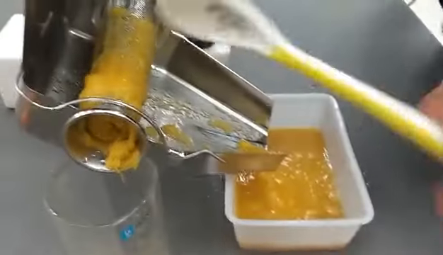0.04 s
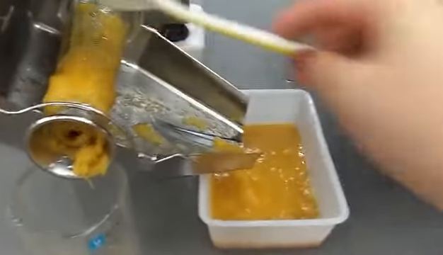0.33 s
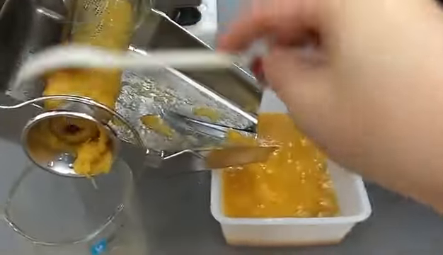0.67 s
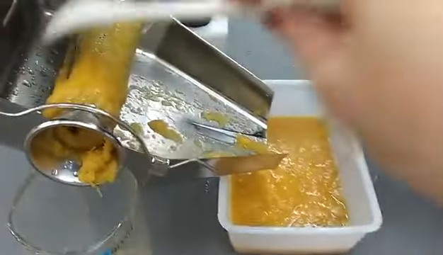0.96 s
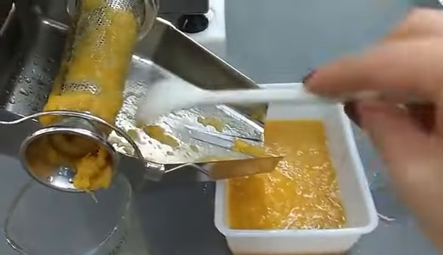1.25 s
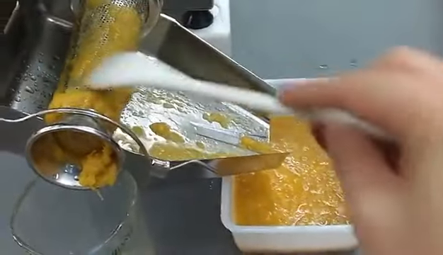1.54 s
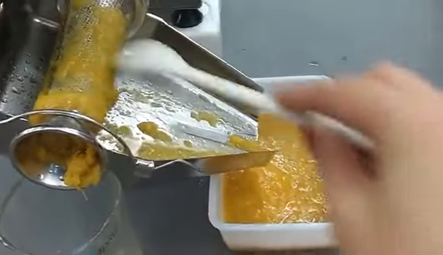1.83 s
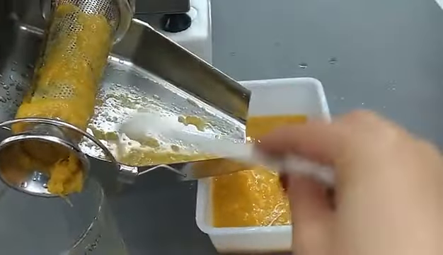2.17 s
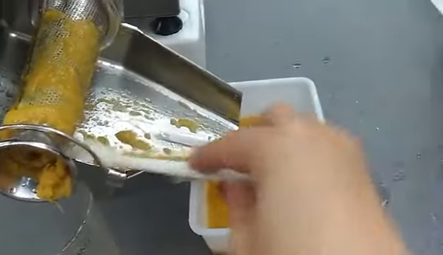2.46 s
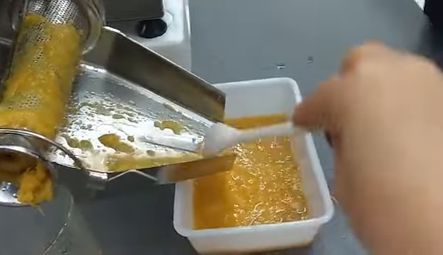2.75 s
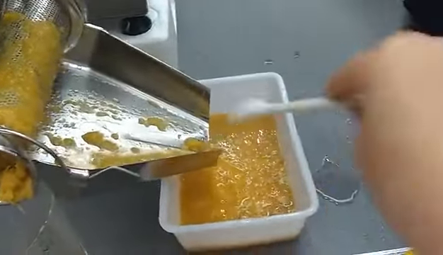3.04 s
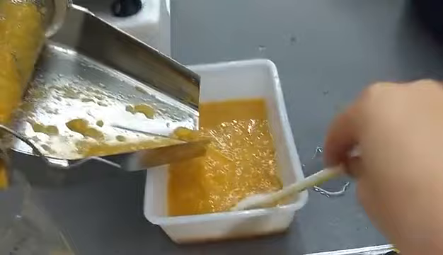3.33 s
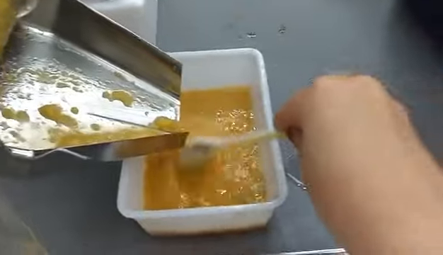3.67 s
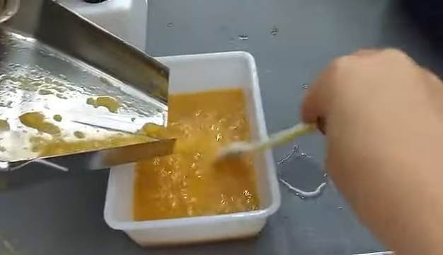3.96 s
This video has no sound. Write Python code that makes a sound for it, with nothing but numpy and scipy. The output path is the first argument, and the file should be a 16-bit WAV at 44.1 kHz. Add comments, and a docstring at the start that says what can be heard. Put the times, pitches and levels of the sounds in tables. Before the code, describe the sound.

Close up in a small room, a slow juicer runs with a steady grinding hum, pulp crackles and dull knocks. Early on a plastic spoon scrapes briefly; later it strikes steel twice, with a squeaky scrape in between.

```python
"""A slow juicer on a counter in a small room, close to a stereo microphone.
From the start the motor hums, the gears shake the housing, and the screw crunches pulp and knocks dully.
Almost at once a plastic spoon rasps over the holes of the strainer. Just after two seconds it strikes
the steel chute, drags down it with a brief squeal, then strikes the lip and slides off.
The room answers pulp, knocks and spoon with a short tail, and the machine runs on."""
import sys
import numpy as np
from scipy import signal
from scipy.fft import rfft, irfft
from scipy.io import wavfile
from scipy.ndimage import uniform_filter1d

SR = 44100
rng = np.random.default_rng(int(sys.argv[2]) if len(sys.argv) > 2 else 0)


def dump_mix(stems):
    """Bounce the given channels to the path in sys.argv[1] as a 16-bit WAV at rate SR."""
    frames = np.atleast_2d(stems).T  # one column per channel
    limited = np.clip(frames, -1, 1)  # hard clip at full scale
    pcm = np.round(limited * 32767).astype(np.int16)
    wavfile.write(sys.argv[1], SR, pcm)


N = 176400
SLIPS_PER_S, SLIP_SPREAD_DB = 2400, 1.5

# modes of the steel chute: pitch_hz, relative_db, t60_s
CHUTE_MODES = [(584, -13, .09), (706, -11, 0.13), (843, -8, 0.092), (1100, -9, .07), (1537, -4, 0.088),
               (1911, -2, 0.07), (2100, -12.5, 0.042), (2350, -9, 0.035), (2480, -5.5, 0.088),
               (2797, -8, 0.09), (3520, -11, 0.15), (3860, -6, .05), (4320, -9.5, 0.065), (4910, -7, 0.045),
               (6620, -14.5, 0.07)]
# dense clatter of spoon on steel: frequency_hz, relative_db
CLATTER_SPECTRUM = [(120, -15.5), (450, -10.5), (800, -5), (1400, -7), (2800, 2), (4000, -10.5),
                    (5300, -25), (7300, -24), (8200, -69.5)]


def amp(db):
    """Decibels to gain."""
    return 10 ** (np.asarray(db) / 20)


def unit(x):
    """Scales to rms 1."""
    return x / np.sqrt(np.mean(x ** 2) + 1e-20)


def bins():
    """Frequencies of a whole-length spectrum."""
    return np.fft.rfftfreq(N, 1 / SR)


def db_at(points, hz):
    """Reads rows of (frequency_hz, level_db) on a log-frequency axis."""
    frequency_hz, level_db = np.transpose(points)
    return np.interp(np.log(hz + 1), np.log(frequency_hz + 1), level_db)


def response(points):
    """Gain at every bin from rows of (frequency_hz, level_db)."""
    return amp(db_at(points, bins()))


def envelope(points, outside_db=None):
    """Gain over time from rows of (time_s, level_db); the ends hold unless outside_db is given."""
    return amp(np.interp(np.arange(N) / SR, *np.transpose(points), left=outside_db, right=outside_db))


def add(mix, start_s, sound):
    """Mixes a stereo sound in at start_s."""
    part = mix[:, round(start_s * SR):][:, :sound.shape[1]]
    part += sound[:, :part.shape[1]]


def side_share(hz):
    """Stereo width at the microphone as a gain: narrow bass, wide treble."""
    # side against mid: frequency_hz, side_db
    width = [(30, -21), (80, -28.5), (170, -39), (320, -19.5), (700, -13), (1400, -4.5), (2800, -3),
             (5000, 1.5), (7500, 0.5)]
    return amp(db_at(width, hz))


def colour(pair, gain):
    """Filters two unrelated signals into left and right, alike in the bass; rms 1."""
    mid, side = rfft(pair)
    side = side * side_share(bins())
    return unit(irfft(np.array([mid + side, mid - side]) * gain, N))


def noise(gain):
    """Stereo noise with the given spectrum, rms 1."""
    return colour(rng.standard_normal((2, N)), gain)


def band(hz, width_hz):
    """Noise in one resonance."""
    return noise(1 / (1 + 1j * (bins() - hz) / width_hz) ** 2)


def glide(x, shift_hz):
    """Moves a sound up and down in frequency by shift_hz."""
    return (signal.hilbert(x) * np.exp(2j * np.pi * np.cumsum(shift_hz) / SR)).real


def drift(rate_hz):
    """Slow random movement, rms 1."""
    return unit(irfft(rfft(rng.standard_normal(N)) / (1 + (bins() / rate_hz) ** 4), N))


def clicks(per_s, spread_db):
    """Random clicks of uneven size, each with its own direction."""
    size = amp(spread_db * np.minimum(rng.exponential(1, N), 4))
    angle = rng.uniform(0, 2 * np.pi, N)
    return size * (rng.random(N) < per_s / SR) * np.array([np.cos(angle), np.sin(angle)])


def patchy(x, depth_db, length_s, band_hz):
    """Patches of time and frequency swell and sink at random."""
    frames = signal.stft(x, nperseg=512)[2]
    hop_s, bin_hz = 256 / SR, SR / 512
    patches = rng.standard_normal(frames.shape[1:])
    patches = uniform_filter1d(patches, max(1, round(band_hz / bin_hz)), axis=0)
    patches = unit(uniform_filter1d(patches, max(1, round(length_s / hop_s)), axis=1))
    return signal.istft(frames * unit(amp(depth_db * patches)))[1][:, :N]


def motor():
    """Magnetic hum, steady in pitch, whose lines waver in strength."""
    # lines of the hum: pitch_hz, relative_db
    lines = [(49.9, -54), (100, -54), (300.05, -36), (400, -56), (1200, -56)]
    # swells and dips of the whole hum: time_s, relative_db
    swells = [(0.0, -34.5), (0.23, -38.5), (0.27, -28.5), (0.52, -38), (0.67, -28.5), (0.98, -39),
              (1.02, -33.5), (1.27, -42.5), (1.76, -32), (1.87, -37), (2.07, -30.5), (2.85, -38.5),
              (3.09, -34.5), (3.36, -40), (3.44, -31), (3.79, -38), (3.85, -30), (4.0, -39.5)]
    t, out = np.arange(N) / SR, np.zeros((2, N))
    for hz, db in lines:
        skew = np.arctan(side_share(hz)) * np.array([[-.5], [.5]])  # phase between left and right
        strength = amp(db + 0.5) * np.sqrt(2) * (1 + 0.16 * drift(rate_hz=7.1))
        out += strength * np.sin(2 * np.pi * (hz * t + rng.random()) + skew)
    return out * unit(envelope(swells))


def gears():
    """The gears churn, and their faint whine swings in pitch as the load comes and goes once a turn."""
    # gear noise: frequency_hz, relative_db
    spectrum = [(15, -45), (35, -17), (50, -12.5), (70, -8.5), (120, -10.5), (230, -12), (350, -6.5),
                (500, -12.5), (650, -17.5), (780, -8.5), (1040, -12.5), (1240, -13.5), (1670, -20),
                (1940, -13), (2420, -21.5), (2750, -16), (4000, -28), (5300, -34.5), (7300, -43),
                (8200, -83.5)]
    turns_per_s, top_s, swing_hz = 2.83, .255, 18
    turn = np.cos(2 * np.pi * turns_per_s * (np.arange(N) / SR - top_s))
    churn = patchy(noise(response(spectrum)), depth_db=2.5, length_s=0.053, band_hz=450)
    whine = glide(band(hz=1968, width_hz=6), swing_hz * turn)
    return amp(-36 - 0.1 * turn) * churn + amp(-46.5) * whine


def housing():
    """Shaken by the gears, the housing drones at its resonances."""
    # resonances of the housing: pitch_hz, width_hz, level_db
    resonances = [(155.6, 7.1, -45), (177.5, 5.3, -46.5), (247, 35.6, -42.5), (293.7, 18.4, -43),
                  (395.7, 11, -53.5), (417.8, 9.1, -49), (622.4, 28.4, -41), (667.5, 17, -42),
                  (713, 29, -51.5), (1143.6, 21, -46.5), (1193, 18, -49.5), (1297, 14, -49),
                  (1449, 35, -48.5), (857, 45, -47), (2690, 190, -52)]
    return sum(amp(db) * band(hz, width_hz) for hz, width_hz, db in resonances)


def pulp():
    """Pulp crackles in the screw all along, and at times crunches louder."""
    # crunching pulp: frequency_hz, relative_db
    spectrum = [(200, -25), (600, 2), (1200, 3.5), (2200, -2), (3300, -8.5), (5000, -20.5), (7400, -34),
                (8000, -77)]
    # louder crunches: start_s, length_s, level_db, tilt_db_per_octave
    crunches = [(0.294, 0.055, -30, -2), (1.039, 0.035, -30.5, 2), (1.137, 0.018, -40, 5),
                (1.302, 0.018, -31, 5.5), (1.692, 0.062, -32.5, -1), (2.044, 0.096, -37.5, -1.5),
                (2.941, 0.024, -31.5, -2), (3.23, 0.018, -26.5, 0.5), (3.688, 0.033, -30.5, -0.5)]
    tone, octaves, rise_s = response(spectrum), np.log2(bins() + 1), .007
    out = amp(-45.5) * colour(clicks(per_s=250, spread_db=2), tone)
    crackle = clicks(per_s=2500, spread_db=1.9)
    for start_s, length_s, db, tilt in crunches:
        age = np.maximum(np.arange(N) / SR - start_s, 0)
        shape = np.minimum(age / rise_s, 1) * np.exp(-(age / length_s) ** 2)
        out += amp(db) * shape * colour(crackle, tone * amp(tilt * octaves))
    return out


def screw_knocks():
    """The screw knocks in its housing, each time one dull, damped tone in the centre."""
    # knocks: start_s, level_db, pitch_hz, t60_s
    knocks = [(0.274, -27.5, 253, 0.22), (1.291, -16.5, 621, 0.079), (1.352, -25, 660, 0.11),
              (2.615, -25, 629, 0.19), (3.403, -25.5, 688, 0.11), (3.452, -22.5, 312, 0.11),
              (3.668, -21.5, 656, 0.094), (3.85, -20, 640, 0.065)]
    t, out, rise_s = np.arange(SR // 4) / SR, np.zeros((2, N)), 0.004
    for start_s, db, hz, t60 in knocks:
        shape = np.minimum(t / rise_s, 1) * amp(db - 60 * t / t60)
        add(out, start_s, shape * np.sin(2 * np.pi * hz * t) * np.ones((2, 1)))
    return out


def rasp(spectrum):
    """Tiny slips make a rasp whose colour shifts as the spoon travels."""
    slips = colour(clicks(SLIPS_PER_S, SLIP_SPREAD_DB), response(spectrum))
    return patchy(slips, depth_db=4, length_s=0.042, band_hz=220)


def strainer_scrape():
    """The spoon ticks over the holes of the pulp-damped strainer, whose resonances shift under it."""
    # the spoon's stroke: time_s, level_db
    stroke = [(.35, -60), (.376, -32.5), (.42, -31.5), (.445, -30), (.52, -29), (.575, -32), (.612, -31),
              (.63, -46)]
    # rasp on the strainer: frequency_hz, relative_db
    spectrum = [(400, -31), (850, -4), (1400, 5), (2000, 2), (2700, -0.5), (3500, 0), (4600, -7),
                (6000, -13.5), (7400, -12), (7900, -57.5)]
    # resonances of the strainer: pitch_hz, width_hz, relative_db
    resonances = [(2200, 65, -2), (2550, 54, 1), (2880, 52, -1.5), (3323, 45, 0), (4420, 25, -4.5),
                  (5100, 22, -9.5), (5670, 29, -7), (6860, 95, -12.5)]
    holes_per_s = 300 * (1 + .2 * drift(rate_hz=29.7))
    ticking = unit(amp(0.5 * np.cos(2 * np.pi * np.cumsum(holes_per_s) / SR)))
    metal = 0
    for hz, width_hz, db in resonances:
        shift_hz = hz * .003 * drift(rate_hz=9)
        metal = metal + amp(db) * glide(band(hz, width_hz), shift_hz)
    return envelope(stroke, outside_db=-120) * ticking * (rasp(spectrum) + amp(-2) * unit(metal))


def spoon_catches():
    """On strainer and chute the spoon catches and lets go with a short clatter."""
    # catches: start_s, level_db
    catches = [(0.44, -20), (.461, -21.5), (0.565, -24), (0.574, -25), (0.602, -20.5), (2.3234, -23.5),
               (2.337, -22.5), (2.342, -22.5), (2.386, -20), (2.392, -25.5), (2.474, -29)]
    t, t60_s = np.arange(N) / SR, 0.04
    snags = sum((t > start_s) * amp(db - 60 * abs(t - start_s) / t60_s) for start_s, db in catches)
    return snags * noise(response(CLATTER_SPECTRUM))


def steel_ring(modes):
    """Steel modes after one impulse, energy 1; high modes reach the two sides out of step."""
    t = np.arange(SR // 3) / SR
    out = np.zeros((2, len(t)))
    for hz, db, t60 in modes:
        skew = np.arctan(side_share(hz)) * rng.choice([-1, 1]) * np.array([[1], [-1]])
        out += amp(db - 60 * t / t60) * np.sin(2 * np.pi * (hz * t + rng.random()) + skew)
    return unit(out) / np.sqrt(len(t))


def burst(spectrum, t60_s, rise_s=0.0012):
    """The dying puff of noise from one contact, energy 1."""
    t = np.arange(SR // 3) / SR
    shape = np.minimum(t / rise_s, 1) * amp(-60 * t / t60_s)
    return unit(noise(response(spectrum))[:, :len(t)] * shape) / np.sqrt(len(t))


def spoon_blows():
    """Each blow cracks and sets the wet steel ringing; the spoon chatters in quick rebounds."""
    # blows on the chute, then its lip: start_s, ring_db, crack_db, left_minus_right_db
    blows = [(2.2266, 14.5, 5.5, -1.5), (2.753, 14, 8.5, 0)]
    # modes of the lip: pitch_hz, relative_db, t60_s
    lip_modes = [(748, -1.5, 0.091), (1410, -13.5, 0.1), (1560, -19.5, 0.071), (1770, -14.5, 0.32),
                 (1960, -11, 0.079), (2500, -1, 0.052), (2598, 6, 0.062), (3000, -19, .08),
                 (3200, -9, 0.047), (3420, -6.5, 0.08), (3810, 1.5, 0.053), (4000, -11, .04),
                 (6540, -23, .06)]
    # first crack of a blow: frequency_hz, relative_db
    crack = [(500, -23), (2500, 1), (4200, 6.5), (5800, -1.5), (8000, -18)]
    # contacts and rebounds within the blows: start_s, level_db
    contacts = [(2.2274, 12.5), (2.2315, 8), (2.2482, 3), (2.7535, 8.5), (2.7566, 8.5), (2.7604, 9.5),
                (2.7745, 3)]
    out, ring_rise_s = np.zeros((2, N)), 0.0018
    onset = np.minimum(np.arange(SR // 3) / SR / ring_rise_s, 1)
    for (start_s, ring_db, crack_db, pan_db), modes in zip(blows, (CHUTE_MODES, lip_modes)):
        pan = amp([[pan_db / 2], [-pan_db / 2]])
        add(out, start_s, pan * amp(crack_db) * burst(crack, t60_s=0.011))
        add(out, start_s, pan * amp(ring_db) * onset * steel_ring(modes))
    for start_s, db in contacts:
        add(out, start_s, amp(db) * burst(CLATTER_SPECTRUM, t60_s=0.045))
    return out


def chute_drag():
    """The spoon rasps down the chute and off its lip; its slips keep the steel ringing."""
    # two strokes, along the chute and off the lip, each in rows of: time_s, level_db
    strokes = [
        [(2.24, -46), (2.275, -32), (2.312, -31.5), (2.344, -28.5), (2.37, -39.5), (2.39, -28.5), (2.428, -31),
         (2.482, -29.5), (2.515, -31), (2.566, -33), (2.61, -67)],
        [(2.765, -24), (2.80, -34), (2.828, -26.5), (2.85, -37), (2.89, -55.5)],
    ]
    # rasp on the chute: frequency_hz, relative_db
    spectrum = [(400, -21), (750, 1), (1270, -7), (2000, -1), (2800, -0.5), (3700, -9), (4800, -12),
                (5400, -27), (6100, -21), (7400, -27.5), (7950, -68)]
    force = sum(envelope(stroke, outside_db=-120) for stroke in strokes)
    rubbing = force * rasp(spectrum)
    slips = force * unit(clicks(SLIPS_PER_S, SLIP_SPREAD_DB))[:1]
    ringing = signal.fftconvolve(slips, steel_ring(CHUTE_MODES), axes=1)[:, :N]
    return rubbing + amp(-9.5) * ringing


def chute_squeal():
    """Dragged hard along the chute, the spoon briefly squeals."""
    # bands of the squeal: pitch_hz, width_hz, relative_db
    bands = [(2750, 80, -6.5), (2970, 87, -3.5), (3440, 30, -2), (4200, 25, -5), (4530, 99, -6),
             (5870, 160, -13.5)]
    t, peak_s, width_s = np.arange(N) / SR, 2.487, 0.029
    squeal = unit(sum(amp(db) * band(hz, width_hz) for hz, width_hz, db in bands))
    return amp(-28.5) * squeal * np.exp(-((t - peak_s) / width_s) ** 2)


def room(x, t60_s=0.15, level_db=-5, gap_s=.003):
    """The small room returns a short diffuse tail."""
    t = np.arange(SR // 2) / SR
    tail = noise(1)[:, :len(t)] * amp(-60 * t / t60_s) * (t > gap_s)
    return amp(level_db) * signal.fftconvolve(x, unit(tail) / np.sqrt(len(t)), axes=1)[:, :N]


def scene():
    """Machine, spoon and room at the close microphone, each side of which has its own colour."""
    # balance of the microphone: frequency_hz, left_minus_right_db
    balance = [(300, -.1), (700, -.6), (1550, -.7), (2200, 2.2), (2700, 1.2), (3400, 4.5), (4200, -.5),
               (5900, 0), (7200, -7)]
    screw = pulp() + screw_knocks()
    scrapes = strainer_scrape() + chute_drag() + chute_squeal() + spoon_catches()
    spoon = scrapes * amp([[0.17], [-0.17]]) + spoon_blows()  # scrapes sit a touch to the left
    mix = motor() + gears() + housing() + screw + spoon + room(spoon + screw)
    sides = amp(db_at(balance, bins()) * np.array([[.5], [-.5]]))
    return irfft(rfft(mix) * sides, N)


def record(dry):
    """The highest peaks are rounded, then the top treble is cut off."""
    ceiling, cutoff_hz = .8, 7850
    rounded = dry / (1 + (dry / ceiling) ** 6) ** (1 / 6)
    lowpass = signal.firwin(301, cutoff_hz, window=("kaiser", 8), fs=SR)
    return signal.oaconvolve(rounded, lowpass[None], "same")


dry = scene()
out = record(dry)
dump_mix(out)
```